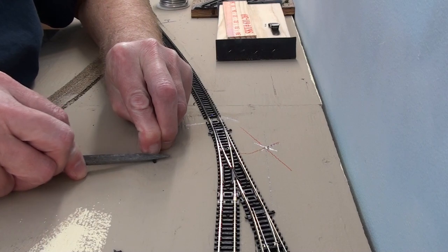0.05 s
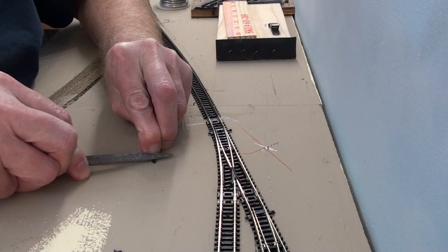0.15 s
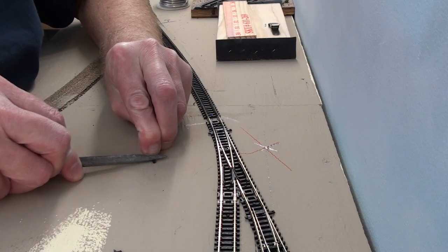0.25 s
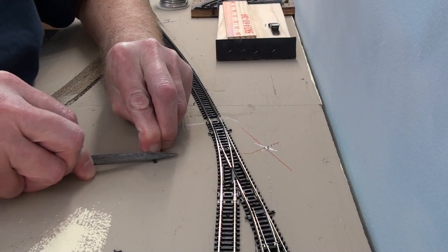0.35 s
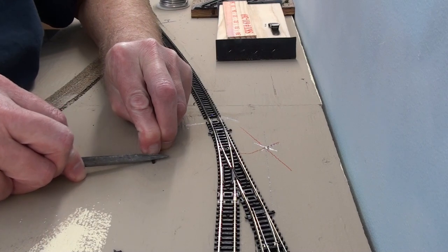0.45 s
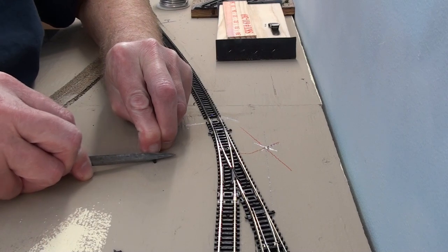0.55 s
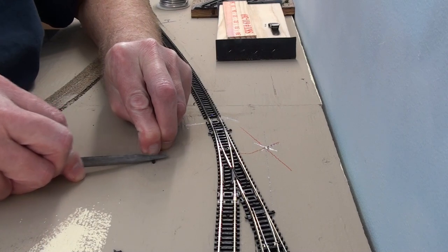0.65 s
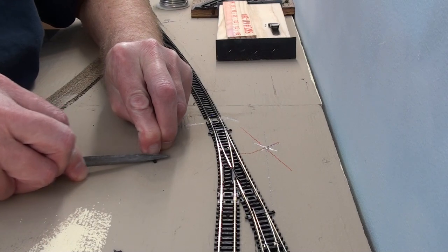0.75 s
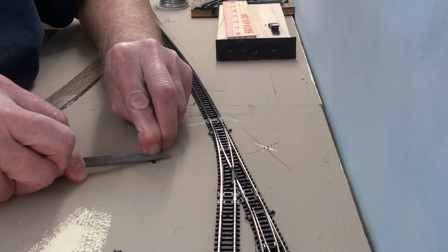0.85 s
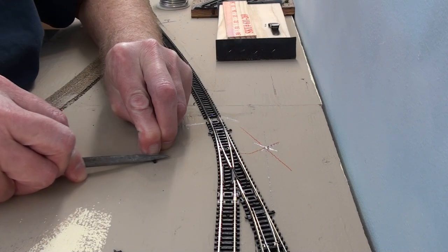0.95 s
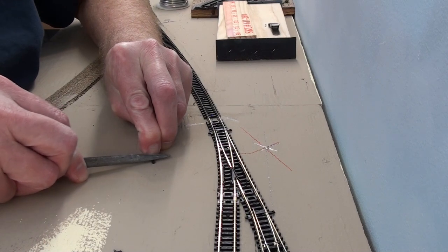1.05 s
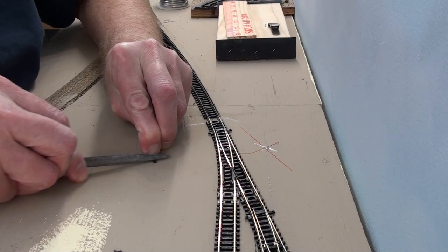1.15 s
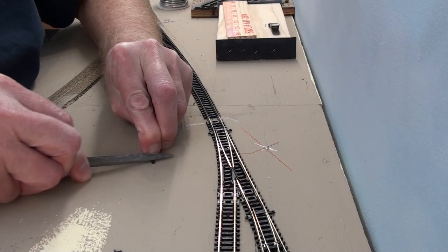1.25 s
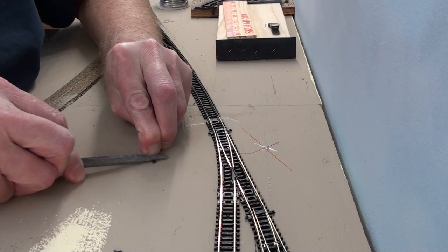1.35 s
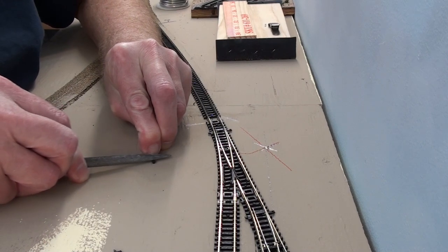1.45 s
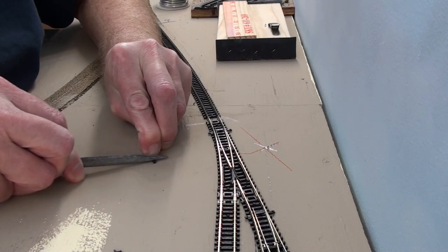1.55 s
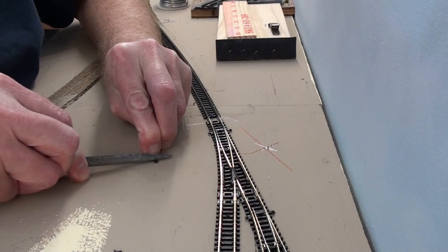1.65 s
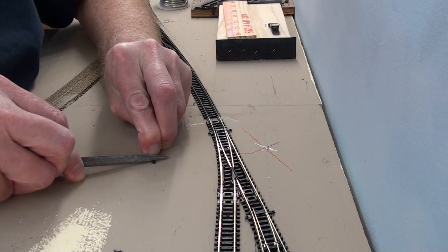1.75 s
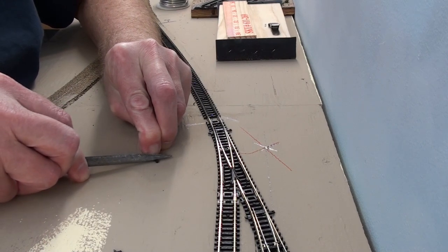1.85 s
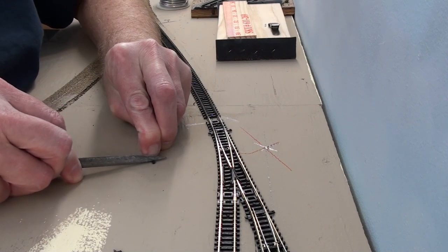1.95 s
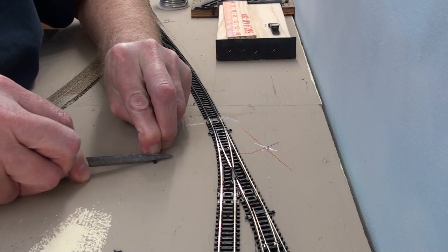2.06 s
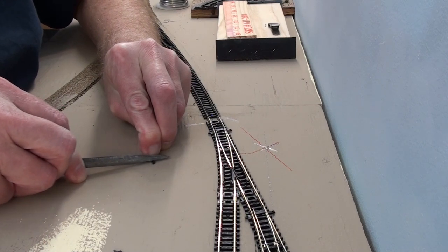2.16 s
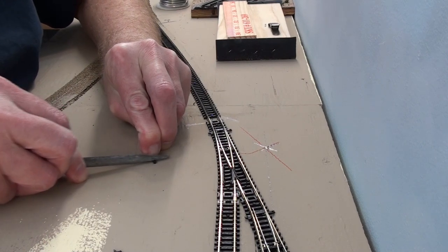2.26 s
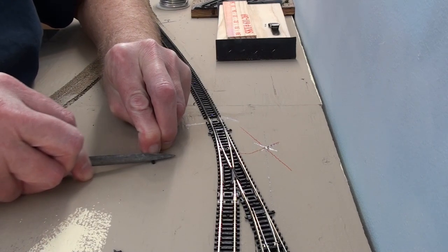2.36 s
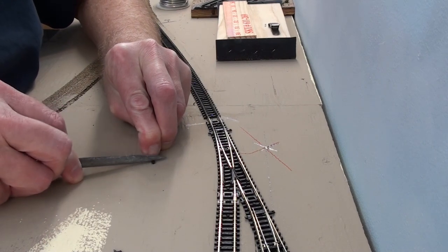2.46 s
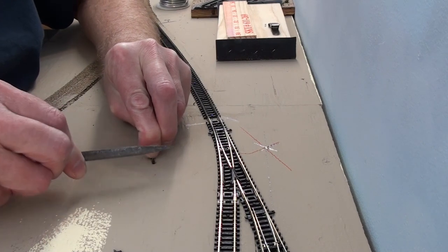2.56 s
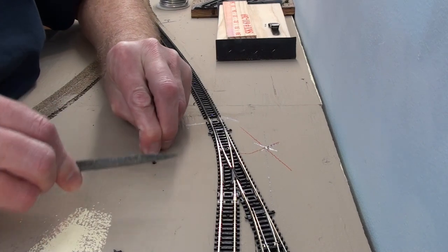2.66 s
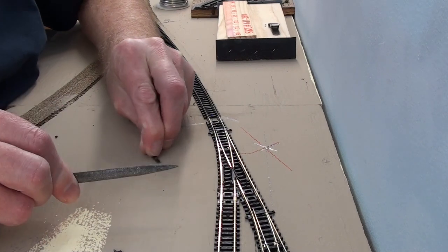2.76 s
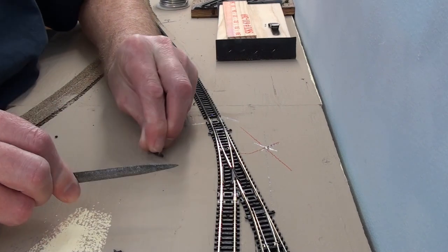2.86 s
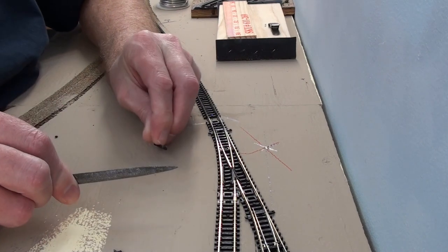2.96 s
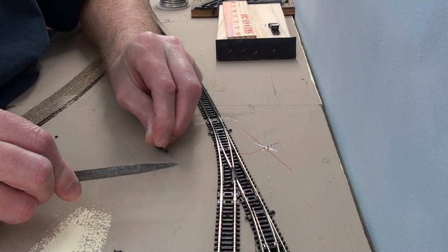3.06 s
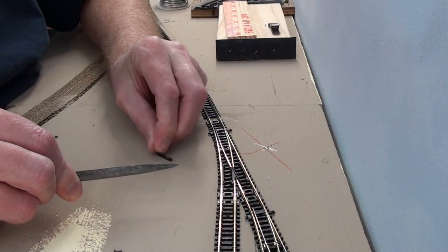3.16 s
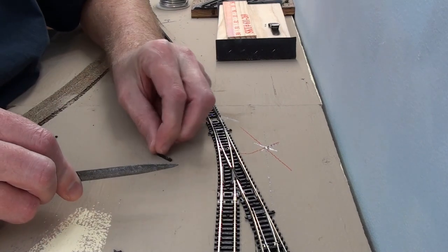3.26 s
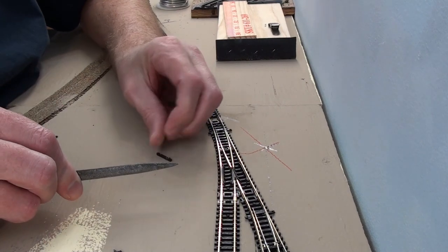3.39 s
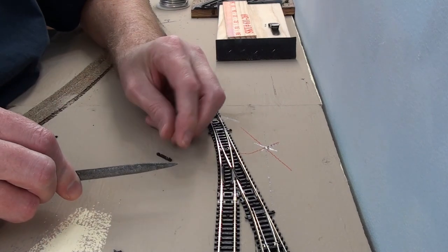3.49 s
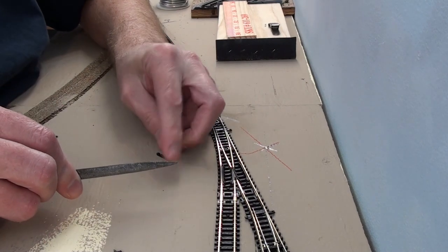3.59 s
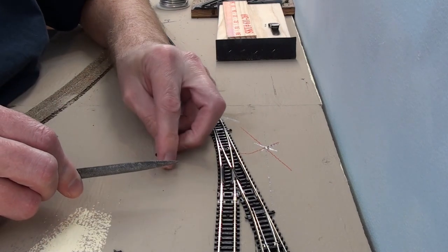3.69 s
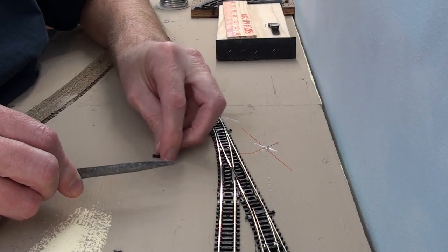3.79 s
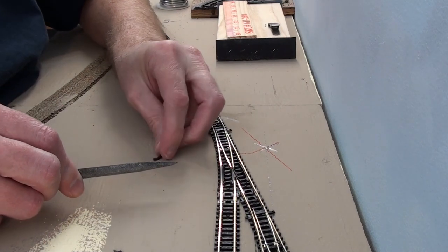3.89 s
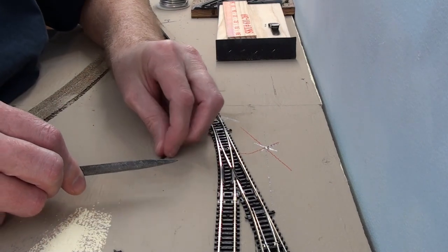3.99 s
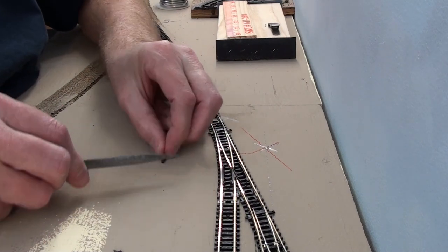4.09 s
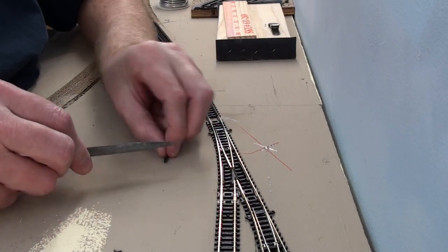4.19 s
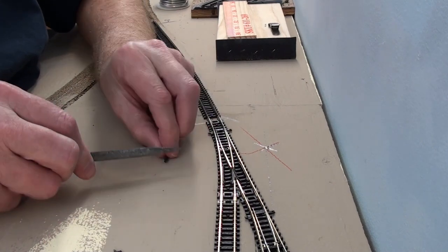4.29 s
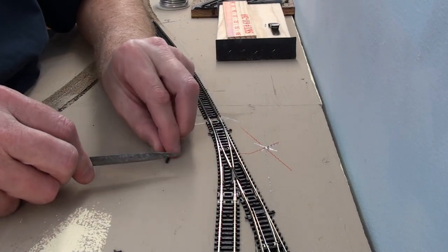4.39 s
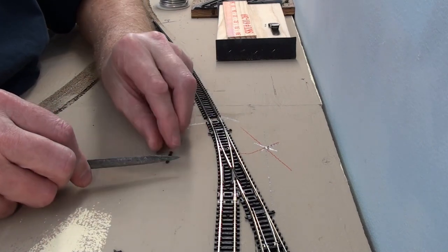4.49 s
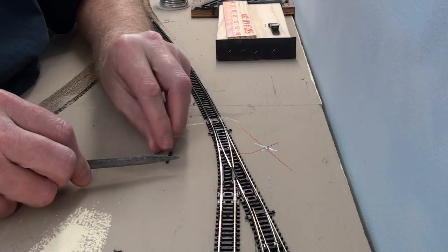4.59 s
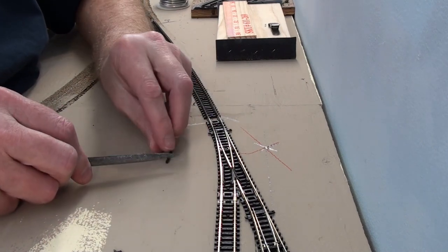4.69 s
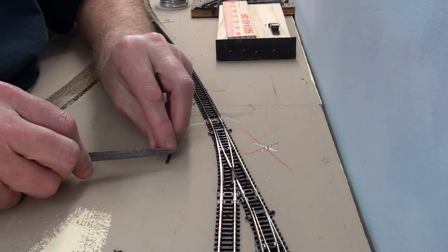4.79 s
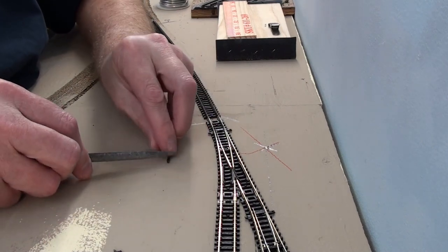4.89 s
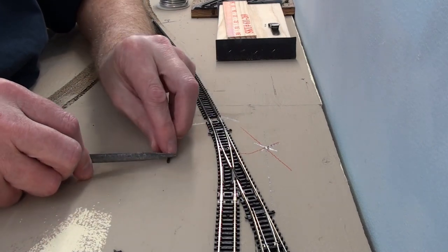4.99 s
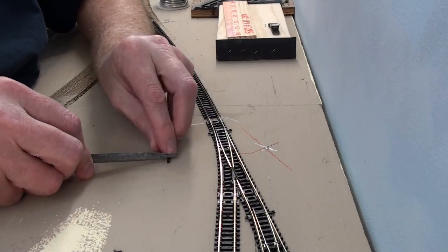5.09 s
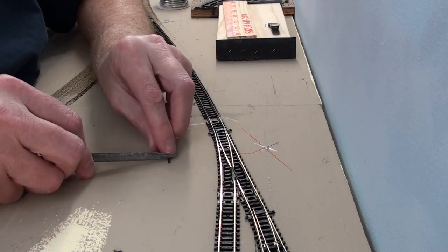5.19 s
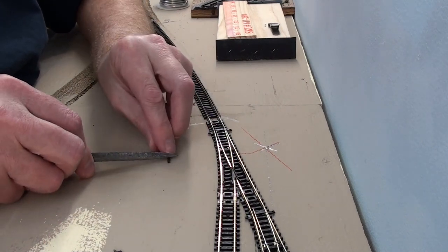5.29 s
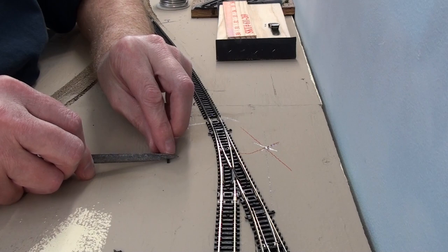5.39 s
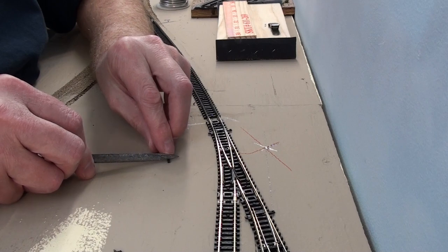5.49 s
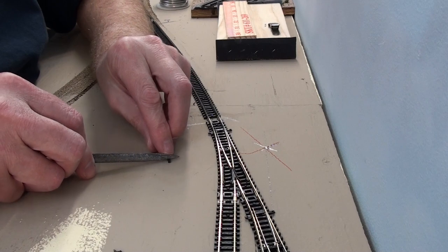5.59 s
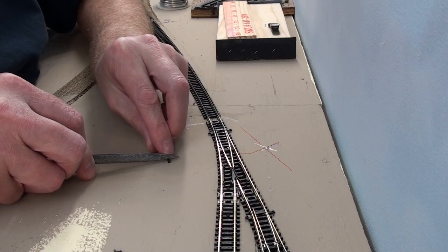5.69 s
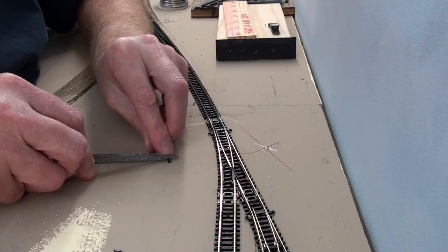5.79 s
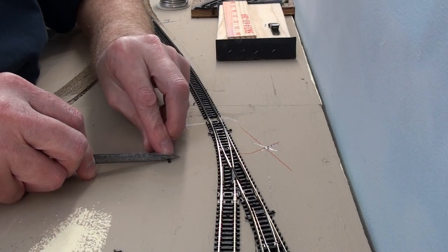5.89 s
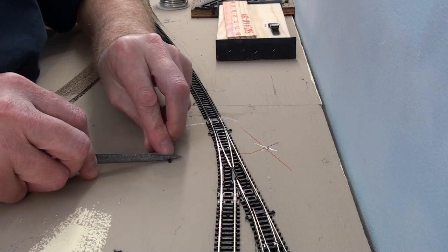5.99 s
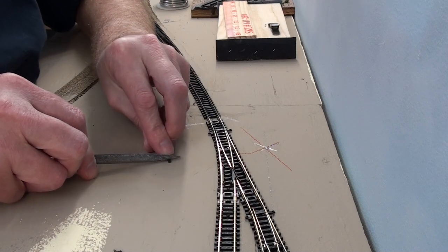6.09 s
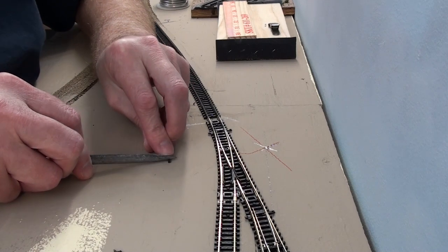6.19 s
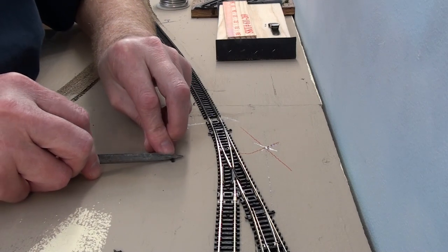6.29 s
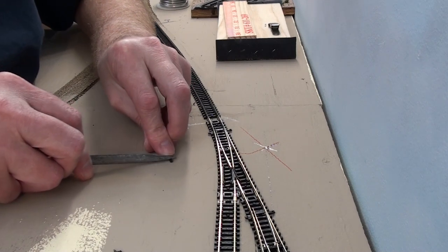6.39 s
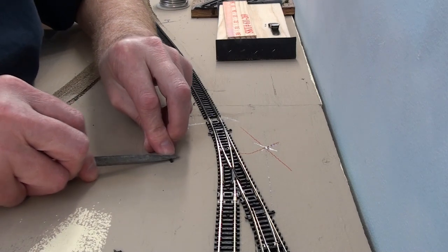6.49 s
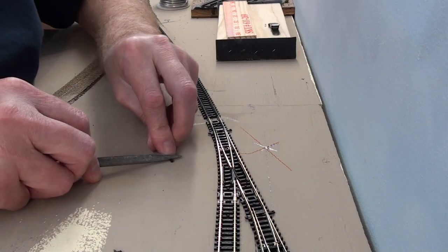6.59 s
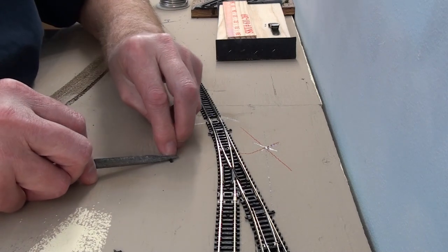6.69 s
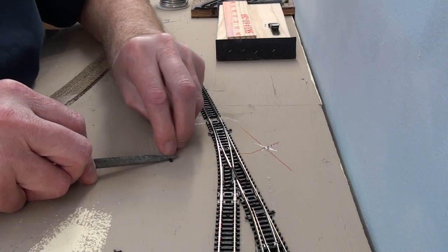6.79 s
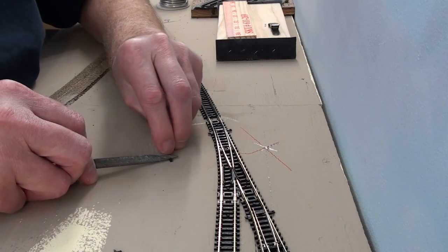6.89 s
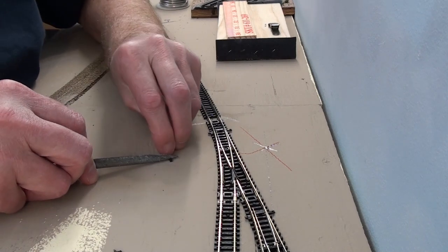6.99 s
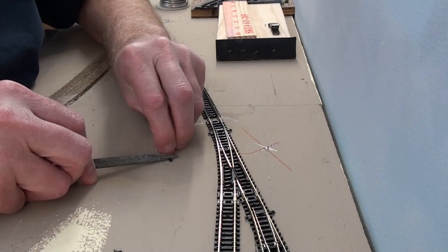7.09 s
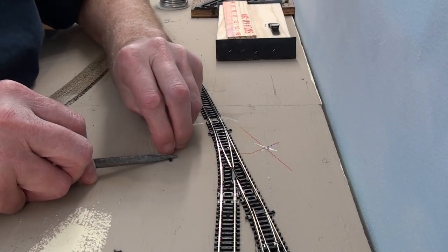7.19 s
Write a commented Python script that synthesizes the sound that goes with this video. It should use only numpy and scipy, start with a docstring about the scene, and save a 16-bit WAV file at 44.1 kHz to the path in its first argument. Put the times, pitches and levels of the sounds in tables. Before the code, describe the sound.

Brisk catching file strokes on a scrap of wood for two and a half seconds, then soft sliding, light bumps and one click.

```python
"""Filing a tiny wooden tie

A needle file is worked over a tiny wooden tie held down on a plywood bench, in a small quiet room.
On each push the teeth catch and slip in a few sharp snaps: wavelets and short rings over bench modes.
Drawn back, the file only rubs: dense tiny contacts, filtered into drumming, rasp and grit.
The tie is let go, slid about and gripped again; light rubs follow, and it tips against the bench
with a click. Decaying noise makes the reflections; room air, a low hum and a faint drone lie beneath."""
import sys
import numpy as np
from scipy import signal
from scipy.fft import rfft, irfft
from scipy.io import wavfile

SR = 44100
rng = np.random.default_rng(int(sys.argv[2]) if len(sys.argv) > 2 else 0)


def materialize(psi):
    """Save the field psi as 16-bit PCM at rate SR to the path in sys.argv[1].

    A 1-D psi becomes a single channel; in a 2-D psi each row is a channel.
    """
    bounded = np.clip(np.atleast_2d(psi).T, -1, 1)
    quanta = np.round(bounded * 32767).astype(np.int16)
    wavfile.write(sys.argv[1], SR, quanta)


N = 319725
T = np.arange(N) / SR   # time [s]

# modes of the plywood bench: (frequency [Hz], relative level [dB], t60 [s])
BENCH_MODES = [(129, -22.5, 0.033), (201.4, -20.5, 0.095), (366, -14.5, 0.021), (388.4, -11, 0.083),
               (462, -17, 0.057), (500, -27.5, 0.1), (601.5, -17, 0.072), (670.5, -16.5, 0.041),
               (785, -12.5, 0.019), (816, -16, 0.055), (968, -27.5, 0.21), (1070, -29, 0.012),
               (1135, -37, 0.54), (1224, -16.5, 0.021), (1484, -31, 0.037)]
MODE_SCATTER_DB = 3   # each blow lands on a new spot and favours other modes


def from_db(db):
    """Decibels to gain."""
    return 10 ** (np.asarray(db) / 20)


def rms_one(x):
    """Scale to unit rms."""
    return x / np.sqrt(np.mean(x ** 2) + 1e-20)


def at_hz(points, hz):
    """Read a table on a log-frequency axis."""
    f, value = np.transpose(points)
    return np.interp(np.log(np.maximum(hz, 1)), np.log(f), value)


def band(x, low_hz, high_hz, order=2):
    """Causal band-pass."""
    sos = signal.butter(order, [low_hz, min(high_hz, .45 * SR)], "band", fs=SR, output="sos")
    return signal.sosfilt(sos, x + 1e-18)


def coloured(x, spectrum):
    """Filter a sound by a table of gains over frequency."""
    size = x.shape[-1]
    gain = from_db(at_hz(spectrum, np.fft.rfftfreq(size, 1 / SR)))
    return irfft(rfft(x) * gain, size)


def stereo_noise(size, width):
    """Noise in two channels, made unlike by a side signal of the given width over frequency."""
    mid, side = rng.standard_normal((2, size))
    return mid + coloured(side, width) * np.array([[1], [-1]])


def drift(rate):
    """Random wander of unit rms: noise through two equal low-pass poles at rate [Hz]."""
    step = 40   # samples between the points of the wander
    r = np.exp(-2 * np.pi * step * rate / SR)
    noise = rng.standard_normal(N // step + 2002)
    slow = signal.lfilter([1], [1, -2 * r, r * r], noise)[2000:]   # skip the start-up
    return np.interp(np.arange(N) / step, np.arange(len(slow)), rms_one(slow))


def ring(force, modes):
    """A force drives damped resonances in parallel, with alternating signs."""
    out = 0
    for k, (hz, db, t60) in enumerate(modes):
        r = from_db(-60 / (t60 * SR))
        w = 2 * np.pi * hz / SR
        resonator = [0, from_db(db) * np.sin(w)], [1, -2 * r * np.cos(w), r * r]
        out = out + (-1) ** k * signal.lfilter(*resonator, force + 1e-18)
    return out


def pulse(force, low_hz, high_hz):
    """Each unit click becomes a heavily damped wavelet of height 1."""
    height = np.abs(band(signal.unit_impulse(512), low_hz, high_hz)).max()
    return band(force, low_hz, high_hz) / height


def clicks(times, db):
    """Single-sample blows."""
    out = np.zeros(N)
    np.add.at(out, np.round(times * SR).astype(int), from_db(db))
    return out


def grains(per_s, spread_db):
    """Dense tiny contacts of uneven size and random sign; rms 1."""
    sizes = from_db(spread_db * np.minimum(rng.exponential(1, N), 4)) * rng.choice([-1, 1], N)
    return rms_one(sizes * (rng.random(N) < per_s / SR))


def struck(times, db, modes):
    """Blows on a body: each excites every mode with a strength of its own."""
    chance = MODE_SCATTER_DB * rng.standard_normal((len(times), len(modes)))
    out = 0
    for k, mode in enumerate(modes):
        out = out + (-1) ** k * ring(clicks(times, db + chance[:, k]), [mode])
    return out


def cracks(times, db, modes):
    """The tie's own short ring; its pitches shift from blow to blow with the grip and the point of contact."""
    grip_detune = 0.02   # spread of the pitches, as a share
    out, t = np.zeros(N), T[:512]
    hz, mode_db, t60 = np.transpose(modes)[:, :, None]
    signs = (-1) ** np.arange(len(modes))[:, None]
    chances = rng.standard_normal((len(times), 2, len(modes), 1))
    for s, level, (shift, strength) in zip(times, db, chances):
        gains = from_db(level + mode_db + MODE_SCATTER_DB * strength) * signs
        tones = np.sin(2 * np.pi * hz * (1 + grip_detune * shift) * t)
        rings = gains * tones * np.exp(-np.log(1000) * t / t60)
        start = round(s * SR)
        out[start:start + len(t)] += rings.sum(axis=0)
    return out


def snaps(events, body, tick_db, crack_db, knock_db, thud_db, bench_db):
    """The tie ticks; a moment later the bench under it recoils and rings, and the blade with it."""
    # the file blade rings with the bench, a short 1.9 kHz ring over two briefer ones:
    # (frequency [Hz], relative level [dB], t60 [s])
    blade_modes = [(1294, -15, 0.011), (1730, -57, 0.004), (1914, -18.5, 0.063)]
    s, tick_level, knock_level = np.transpose(events)
    later = s + 0.0002
    tick, knock = clicks(s, tick_level), clicks(later, knock_level)
    bright = from_db(tick_db) * pulse(tick, low_hz=5460, high_hz=7240)
    bright = bright + from_db(crack_db) * cracks(s, tick_level, body)
    recoil = from_db(knock_db) * pulse(knock, low_hz=794, high_hz=2060)
    recoil = recoil - from_db(thud_db) * pulse(knock, low_hz=338, high_hz=1010)
    ringing = struck(later, knock_level, BENCH_MODES) + struck(later, knock_level, blade_modes)
    return bright + recoil + from_db(bench_db) * ringing


def file_slips():
    """The teeth catch and slip: each release snaps the held tie and knocks the bench."""
    # the snaps of each push: (time [s], relative tick level [dB], relative knock level [dB])
    slips = [(0.1104, -14.5, -16.5), (0.1197, -14, -23.5), (0.1318, -18.5, -16.0), (0.1567, -10.5, -16.5),
             (0.3462, -12.0, -17.0), (0.3619, -16, -17.5), (0.3791, -10.5, -12.5), (0.4027, -13.5, -19.5),
             (0.586, -11.5, -19.5), (0.5897, -11.5, -15.5), (0.6082, -11.5, -13), (0.6135, -32, -25.0),
             (0.8041, -15.5, -15.5), (0.8137, -13.0, -12.5), (0.8187, -24, -33), (0.833, -17.5, -15.5),
             (0.9351, -16.5, -22), (1.0218, -23.0, -22.5), (1.0263, -20, -19), (1.0405, -10, -13),
             (1.224, -23, -24), (1.2298, -21.5, -19.5), (1.2404, -17, -21.5), (1.246, -16.0, -13.5),
             (1.2657, -15.0, -16.5), (1.4392, -13.5, -14.5), (1.4507, -14, -13.5), (1.4537, -14, -18),
             (1.6387, -15.5, -18.5), (1.6424, -15.5, -14), (1.6541, -10, -14.5), (2.0697, -12, -14.0),
             (2.0738, -25, -20.5), (2.0906, -17.0, -16.5), (2.1016, -25, -26), (2.3191, -13.5, -13),
             (2.327, -22.0, -35), (2.333, -21, -17), (2.3417, -20, -20), (2.354, -10.5, -12.5),
             (2.357, -18.5, -20.0)]
    # the short crack of tie and file: (frequency [Hz], relative level [dB], t60 [s])
    crack_modes = [(3130, -12.5, 0.001), (4410, -11.5, 0.0049), (5540, -5, 0.0055), (7020, -9.5, 0.0022),
                   (9500, -17.5, 0.0021), (13100, -28, 0.00042)]
    return snaps(slips, crack_modes, tick_db=7.0, crack_db=8.5, knock_db=2.5, thud_db=-9.5, bench_db=-1.5)


def rubbing():
    """Teeth skate over the wood: the drag drums on the bench, the grit rasps between, and single teeth tick."""
    # light rubs as the file is drawn back or placed:
    # (middle [s], length [s], relative drag level [dB], relative grit level [dB])
    rubs = [(0.013, 0.054, -44.5, -50), (0.257, 0.06, -39.5, -49.5), (0.496, 0.059, -38, -46),
            (0.714, 0.059, -34, -43), (1.145, 0.037, -48, -52), (1.348, 0.049, -34, -46),
            (1.549, 0.04, -43.5, -51.5), (1.864, 0.028, -51, -53.5), (1.975, 0.042, -49.5, -52.5),
            (2.235, 0.03, -47, -54), (2.458, 0.046, -36.5, -46), (2.537, 0.02, -45.5, -52),
            (5.096, 0.054, -51, -66), (5.579, 0.039, -49.5, -61), (6.303, 0.065, -47, -58),
            (6.443, 0.064, -43, -61.5), (6.568, 0.049, -43, -55.5), (6.698, 0.19, -54.5, -60.5),
            (7.079, 0.067, -60, -65.5)]
    fade_s = 0.024   # straddles each end of a rub
    drag, grit = np.zeros((2, N))
    for middle, length, drag_db, grit_db in rubs:
        stroke = np.clip((length / 2 - np.abs(T - middle)) / fade_s + .5, 0, 1)
        drag += from_db(drag_db) * stroke
        grit += from_db(grit_db) * stroke
    teeth = grains(per_s=600, spread_db=3.5)
    fluttering = teeth * from_db(1.8 * drift(46.0))
    single_teeth = grains(per_s=300, spread_db=-1.0)
    bench = ring(teeth, BENCH_MODES)
    drum = drag * rms_one(band(bench, low_hz=129, high_hz=370))
    rasp = from_db(3.5) * grit * rms_one(band(bench, low_hz=516, high_hz=1030))
    crunch = from_db(-7.5) * grit * rms_one(band(fluttering, low_hz=606, high_hz=1850))
    catches = from_db(-8.0) * grit * rms_one(band(single_teeth, low_hz=3130, high_hz=8900))
    return drum + rasp + crunch + catches


def tie_taps():
    """The loose tie taps the bench: tick and recoil as in a slip, with a short, bright ring of its own."""
    # taps: (time [s], relative tick level [dB], relative knock level [dB])
    taps = [(3.2014, -44, -48.5), (3.2196, -41, -48), (3.2224, -36, -55), (3.8915, -41.5, -45),
            (3.9327, -45, -47), (4.0571, -51, -66), (4.2666, -55, -48), (4.469, -54, -54),
            (4.7225, -58, -57), (4.9034, -52, -58), (6.3085, -56.5, -38), (6.334, -65, -41),
            (6.4225, -57, -38.5), (6.5792, -25.5, -22)]
    # ring of the free tie, strongest near 6.3 kHz: (frequency [Hz], relative level [dB], t60 [s])
    tie_modes = [(2730, -13.5, 0.0021), (6330, -1, 0.0019), (7900, -5, 0.0024), (10150, -7, 0.0034)]
    return snaps(taps, tie_modes, tick_db=-6.5, crack_db=12.0, knock_db=2.0, thud_db=-1.0, bench_db=2.0)


def bumps():
    """A padded contact is a long, dull push: it wakes mostly the low modes of the bench."""
    # file and fingertips bump the bench softly: (time [s], relative level [dB], contact cut-off [Hz])
    contacts = [(0.817, -21, 350), (0.937, -21.5, 400), (4.658, -44, 614), (4.724, -48, 700),
                (5.074, -33.5, 292), (5.394, -31.5, 376), (5.432, -28.5, 245), (5.612, -38, 340),
                (6.023, -40.5, 905), (6.178, -37.5, 915), (6.424, -43, 700), (6.583, -37.5, 1100)]
    edge_tick_db = -47   # the file's edge ticks faintly with every bump
    force, t = np.zeros(N), T[:512]
    for s, db, hz in contacts:
        push = t * np.exp(-2 * np.pi * hz * t)
        start = int(s * SR)
        force[start:start + len(t)] += from_db(db) * push / push.sum()
    edge = pulse(clicks(np.array(contacts)[:, 0], edge_tick_db), low_hz=1890, high_hz=8500)
    thump = from_db(11.0) * ring(force, BENCH_MODES)
    return thump + from_db(14.5) * pulse(force, low_hz=603, high_hz=5020) + edge


def sliding():
    """Skin rubs dully and the tie hisses and crackles over the painted board; each slide swells and stops short."""
    # fingers and tie slide over the bench, gather speed and stop:
    # (time of fastest motion [s], rub level [dB], hiss level [dB], swell [dB per s])
    slides = [(2.71, -72, -60.5, 77), (3.735, -56.5, -68, 250), (3.89, -52.5, -51, 86),
              (3.98, -57.5, -60.5, 60), (4.255, -56.5, -57, 20), (4.91, -62.5, -59.5, 95),
              (6.792, -60, -60.5, 36)]
    # tilt of the friction noise: (frequency [Hz], relative level [dB])
    friction_colour = [(300, 8), (900, 1.5), (1800, 3), (3000, -2), (4800, 0.5), (7000, 0.5), (10000, -4),
                       (15000, -24)]
    stop_db_per_s, resting_hand_db = 210, -70   # fall after each slide; floor between slides
    s, rub_db, hiss_db, swell = np.transpose(slides)[:, :, None]
    shape_db = -np.maximum(swell * (s - T), stop_db_per_s * (T - s))
    rub = from_db(np.maximum(np.max(rub_db + shape_db, axis=0), resting_hand_db))
    hiss = from_db(np.maximum(np.max(hiss_db + shape_db, axis=0), resting_hand_db))
    friction = coloured(grains(per_s=1300, spread_db=2.0), friction_colour)
    dull = rms_one(band(friction, low_hz=300, high_hz=2580))
    bright = rms_one(band(friction, low_hz=3700, high_hz=13000))
    flutter = from_db(1.34 * drift(26.4))
    return flutter * (rub * dull + hiss * bright)


def reflections(x, colour, t60_table, delay_s):
    """A diffuse tail: in each half-octave band, noise that dies at its own rate."""
    # stereo width of the tail: (frequency [Hz], side minus mid [dB])
    tail_width = [(150, -21.5), (400, -22.5), (1000, -11.5), (2400, -9), (6000, -5), (15000, -8.5)]
    echo_grain_db = 0.5   # some reflections stand out from the rest
    t = T[:SR * 3 // 4]
    white, tail = stereo_noise(len(t), tail_width), 0
    grain = from_db(echo_grain_db * rng.standard_normal(len(t) // 64 + 1))
    white = white * grain[np.arange(len(t)) // 64]
    edges = 90 * 2 ** np.arange(0, 8, .5)
    f = np.fft.rfftfreq(len(t), 1 / SR)
    spectrum = rfft(white) * from_db(at_hz(colour, f))
    for low, high in zip(edges, edges[1:]):
        hz = np.sqrt(low * high)
        decay = np.log(1000) / at_hz(t60_table, hz)
        dying = irfft(spectrum * ((f >= low) & (f < high)), len(t)) * np.exp(-decay * t)
        share = np.sqrt(2 * (high - low) / SR / len(t))   # energy in proportion to bandwidth
        tail = tail + from_db(at_hz(colour, hz)) * rms_one(dying) * share
    tail = np.pad(tail, ((0, 0), (int(delay_s * SR), 0)))
    return signal.fftconvolve(x[None], tail, axes=1)[:, :N]


def near_scatter(x):
    """Very short reflections off the hands, passing slowly between two patterns as the hands move."""
    # colour of the scatter: (frequency [Hz], relative level [dB])
    scatter_colour = [(150, -2.5), (900, -3.5), (2000, -6), (3500, 2), (6000, -9), (15000, -2.5)]
    scatter_t60 = [(500, 0.051), (8000, 0.013)]   # (frequency [Hz], t60 [s])
    turn = 2 * np.pi * 0.597 * T   # 0.597 turns per second
    out = 0
    for share in (np.cos(turn), np.sin(turn)):
        out = out + share * reflections(x, scatter_colour, scatter_t60, delay_s=0.001122)
    return out


def room_tail(x):
    """The room answers a little later with a diffuse tail that dies soonest at the very top."""
    # colour of the room: (frequency [Hz], relative level [dB])
    room_colour = [(150, -4.5), (500, -8), (1200, -7), (2200, -5), (3100, -1), (4100, -6), (6000, -18),
                   (15000, -5.5)]
    # decay of the room: (frequency [Hz], t60 [s])
    room_t60 = [(150, 0.5), (400, 0.65), (1040, 0.42), (2760, 0.4), (7280, 0.36), (15000, 0.075)]
    return reflections(x, room_colour, room_t60, delay_s=.008)


def room_air():
    """Steady wide noise, heaviest in the bass."""
    # spectrum of the air: (frequency [Hz], relative level [dB])
    air_colour = [(15, -56), (25, -20), (48, -5.5), (70, -0.5), (92, -9), (123, -2.5), (166, -11.5),
                  (195, -3), (223, -12.5), (263, -13.5), (695, -26), (1070, -26.5), (1160, -31.5),
                  (16000, -36)]
    # stereo width of the air: (frequency [Hz], side minus mid [dB])
    air_width = [(60, -22.5), (150, -14.5), (380, 1), (950, 7.5), (2400, 3), (6000, -3), (15000, -19)]
    return from_db(-52.5) * rms_one(coloured(stereo_noise(N, air_width), air_colour))


def low_hum():
    """A low sine whose phase and level waver."""
    # level of the hum: (time [s], level [dB])
    hum_levels = [(0, -55), (3.7, -55), (4.6, -60.5), (7.25, -78)]
    tone = np.sin(2 * np.pi * 65.0 * T + 1.44 * drift(6.7))
    return from_db(np.interp(T, *np.transpose(hum_levels))) * tone * (1 + 0.075 * drift(16))


def faint_drone():
    """A gliding tone that swells and sinks, roughened by random sine and cosine amplitudes."""
    # path of the drone: (time [s], frequency [Hz], relative level [dB])
    drone_path = [(0, 299.6, -55), (2.701, 300.5, -61), (3.301, 282.8, -58.5), (3.8, 250.6, -53.5),
                  (4.402, 236.7, -72), (7.25, 230.6, -65)]
    s, hz, db = np.transpose(drone_path)
    phase = 2 * np.pi * np.cumsum(np.interp(T, s, hz)) / SR
    return from_db(np.interp(T, s, db)) * (drift(31.0) * np.sin(phase) + drift(99) * np.cos(phase))


def scene():
    """The work on the bench, scatter from the hands, the room's tail, then the background."""
    # opposite tilt of the two channels: (frequency [Hz], up on the left and down on the right [dB])
    lean = [(200, 0), (1200, -.5), (2500, 0), (6000, -1.5), (9000, 2.5), (14000, -1)]
    filing = file_slips() + rubbing()
    handling = tie_taps() + bumps() + sliding()
    work = filing + handling
    left, right = work + near_scatter(work) + room_tail(work)
    opposite = [(hz, -db) for hz, db in lean]
    foreground = np.array([coloured(left, lean), coloured(right, opposite)])
    return foreground + room_air() + low_hum() + faint_drone()


def record(dry):
    """The loudest peaks are rounded and the top is cut."""
    # steep low-pass, 60 dB down from 16900 Hz
    top_cut = signal.cheby2(14, 60, 16900, fs=SR, output="sos")
    return signal.sosfilt(top_cut, np.tanh(dry))


dry = scene()
out = record(dry)
materialize(out)
```